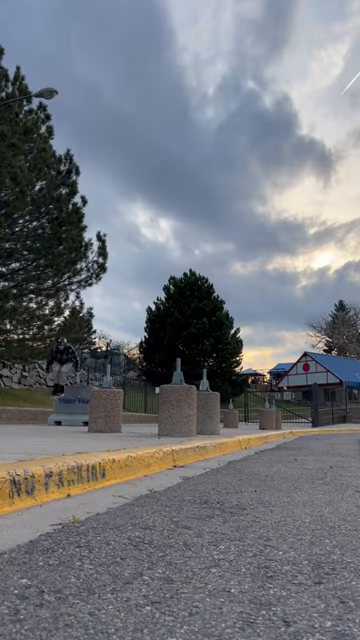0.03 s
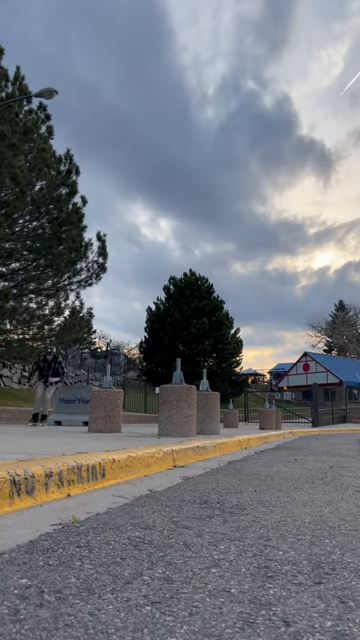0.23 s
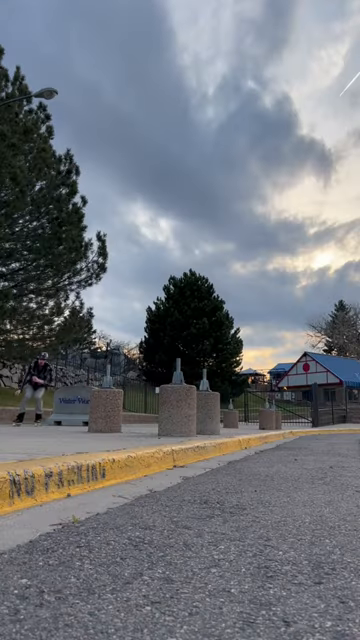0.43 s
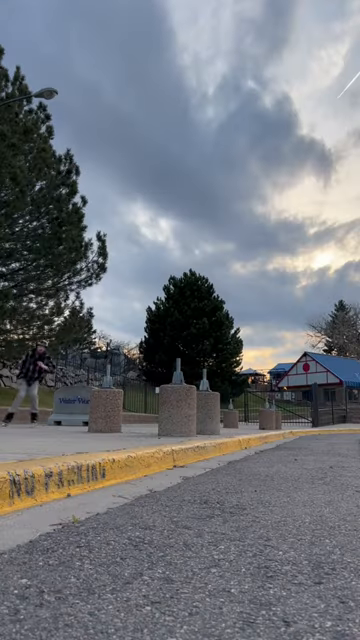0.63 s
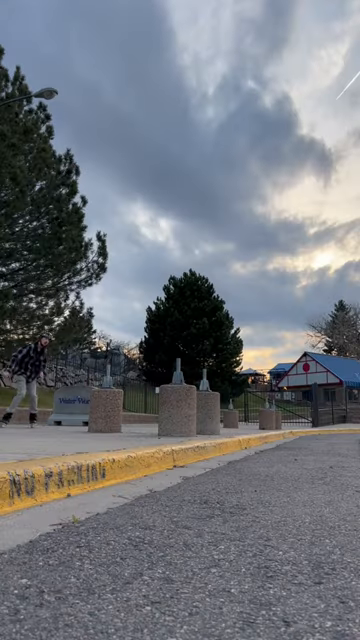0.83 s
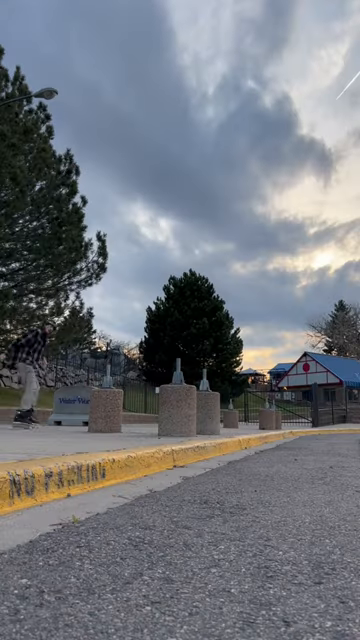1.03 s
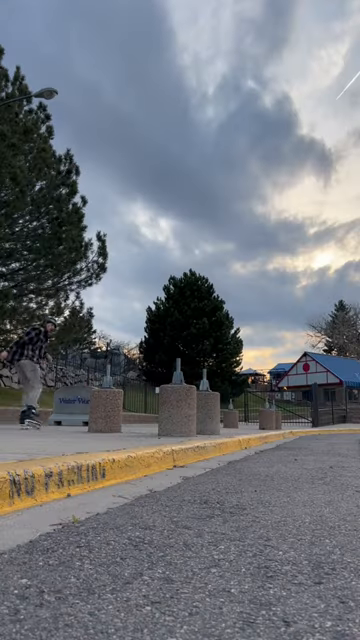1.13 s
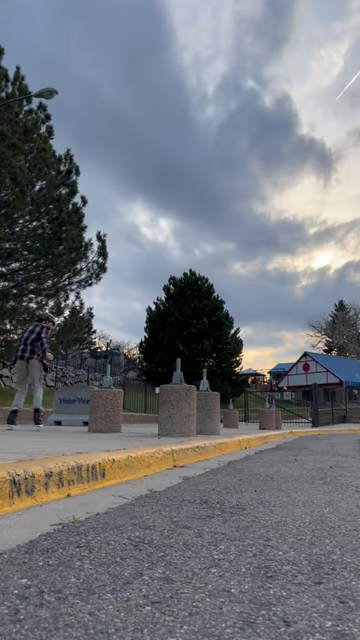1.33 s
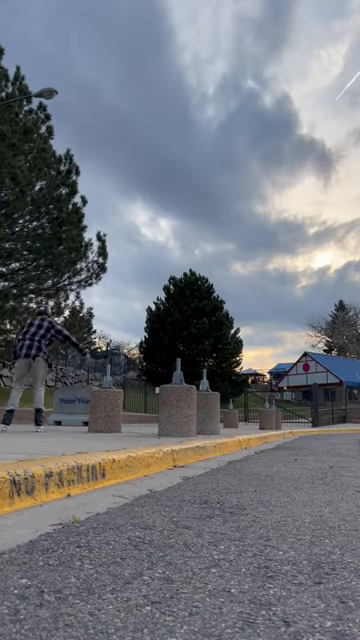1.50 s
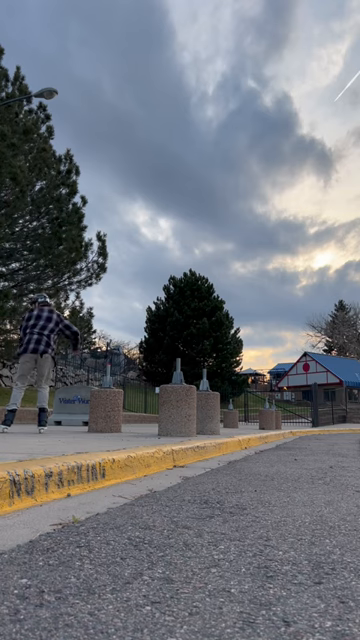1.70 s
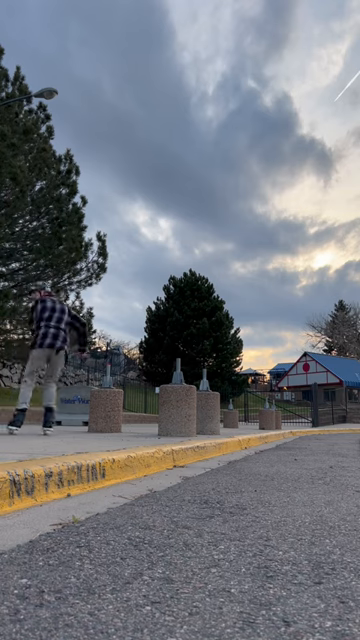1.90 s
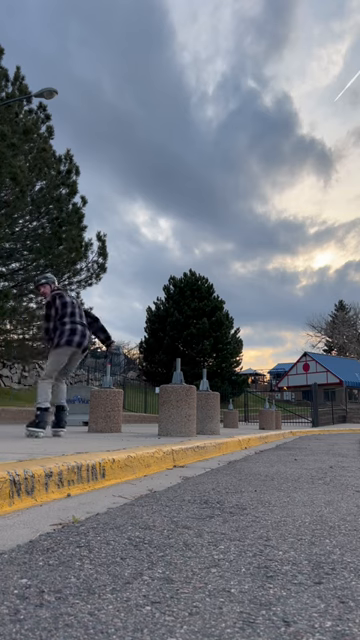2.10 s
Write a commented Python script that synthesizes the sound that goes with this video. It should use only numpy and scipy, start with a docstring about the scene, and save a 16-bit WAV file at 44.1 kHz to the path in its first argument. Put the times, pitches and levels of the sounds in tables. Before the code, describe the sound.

A skater lands a jump with a sharp, hollow clack, then wheels rumble and knock along outdoors

```python
"""An inline skater lands a jump on a concrete pavement and rolls on over grit and joints.
Both skates slam down milliseconds apart: each blow mixes a damped thump, a ringing boot and bursts of noise.
Random grains drive the growl, roar and hiss of rolling; pebbles clack, and later the wheels whir and squeak.
Walls and trees return a short, dull echo made of fading noise.
Low filtered noise is the rumble of wind and distant traffic."""
import sys
import numpy as np
from scipy import signal
from scipy.fft import rfft, irfft
from scipy.io import wavfile

SR = 44100
rng = np.random.default_rng(int(sys.argv[2]) if len(sys.argv) > 2 else 0)


def transcribe(u):
    """Save the signal u as a 16-bit wav file named by the first command-line argument.

    u: samples, shape (n,) or (channels, n), limited to [-1, 1]; the rate is SR.
    q: integer samples, one column per channel.
    """
    v = np.clip(np.atleast_2d(u).T, -1, 1)
    q = np.round(v * 32767).astype(np.int16)
    wavfile.write(sys.argv[1], SR, q)


N = 94815
T = np.arange(N) / SR  # time of each sample in seconds

# How loud the rolling is over time. Each row: time in seconds, then the levels of the low growl,
# the wheel roar and the gritty hiss, all in dB.
ROLLING_LEVELS = [(0, -41.5, -68, -89), (.11, -43.5, -70, -91), (0.161, -37, -58, -75),
                  (0.221, -42, -64, -82), (0.266, -30, -47.5, -53.5), (0.419, -46.5, -47.5, -69),
                  (.6, -42, -50.5, -69), (.8, -45, -47.5, -64), (1.0, -41.5, -48.5, -64.5),
                  (1.14, -40, -51, -66.5), (1.185, -37, -50, -56.5), (1.22, -40, -48, -68),
                  (1.371, -33, -49.5, -71.5), (1.44, -39.5, -54.5, -73), (1.5, -37, -51.5, -69),
                  (1.649, -39.5, -51, -87), (1.8, -42.5, -52, -69), (1.958, -42.5, -46.5, -66),
                  (2.15, -45, -43.5, -60.5)]
# Tone of wheels cracking on concrete. Each row: frequency in Hz, relative level in dB.
CRACK_TONE = [(100, -23), (600, 4.5), (1000, 1.5), (1400, 3.5), (1900, -1), (2400, -10), (3300, -16),
              (4300, -21), (8000, -45.5)]
# Tone of the bright tick of frames and crushed grit. Each row: frequency in Hz, relative level in dB.
TICK_TONE = [(1500, -27.5), (3200, 3.5), (4500, -4.5), (6500, 0), (7500, -4), (8400, -12), (10500, -10.5),
             (12300, -2.5), (13500, 0.5)]


def amp(db):
    """Turns decibels into a gain factor."""
    return 10 ** (np.asarray(db) / 20)


def unit(x):
    """Scales a sound to an average (rms) strength of 1."""
    return x / np.sqrt(np.mean(x ** 2) + 1e-20)


def read(points, hz):
    """Reads a table between its rows, with frequency on a log scale as in hearing."""
    f, value = np.transpose(points)
    return np.interp(np.log(hz + 1), np.log(f + 1), value)


def add(mix, s, sound):
    """Mixes a sound in, starting at s seconds."""
    part = mix[max(round(s * SR), 0):][:len(sound)]
    part += sound[:len(part)]


def colour(x, points):
    """Filters a sound by a table of levels per frequency, then scales it to rms 1."""
    hz = np.fft.rfftfreq(len(x), 1 / SR)
    return unit(irfft(rfft(x) * amp(read(points, hz)), len(x)))


def drift(hz):
    """Random wandering, mostly slower than the given rate, at rms 1."""
    slowness = 1 + (np.fft.rfftfreq(N, 1 / SR) / hz) ** 4
    return unit(irfft(rfft(rng.standard_normal(N)) / slowness, N))


def fading(t, t60):
    """Dies away steadily, losing 60 dB in t60 seconds."""
    return np.exp(-np.log(1000) * t / t60)


def rumble():
    """Wind and distant traffic: random noise, filtered to keep mostly the lows."""
    # Each row: frequency in Hz, relative level in dB.
    rumble_tone = [(20, -48), (32, -45), (50, 1.5), (75, 3.5), (130, 0.5), (220, -10.5), (400, -15.5),
                   (850, -19), (1500, -39), (3000, -73), (7000, -86), (14000, -73)]
    rumble_db = -43
    return amp(rumble_db) * colour(rng.standard_normal(N), rumble_tone)


def grains(spread_db=3, grains_per_s=5000):
    """Wheels hit tiny grains of stone: clicks at random moments, of random size and sign."""
    size = amp(spread_db * np.minimum(rng.exponential(1, N), 5))
    hit = rng.random(N) < grains_per_s / SR
    return size * rng.choice([-1., 1.], N) * hit


def rolling(bump_hz=35, growl_bump_db=0.0, roar_bump_db=1.25, grit_bump_db=1.23):
    """Grains drive a low growl, the wheels' roar and a gritty hiss; uneven ground shakes roar and hiss."""
    # Tones of the growl, roar and hiss. Each row: frequency in Hz, relative level in dB.
    growl_tone = [(40, -29.5), (70, -2), (100, -0.5), (135, -0.5), (190, -7.5), (250, -16), (400, -19.5),
                  (800, -33.5), (2000, -65)]
    roar_tone = [(100, 1.5), (250, 10), (430, -1), (620, -7.5), (880, 3.5), (1250, -2.5), (1850, -3.5),
                 (2350, -21), (3500, -27), (8000, -66)]
    grit_tone = [(800, -15), (2000, -0.5), (2750, 4.5), (3200, -2), (4200, 0), (4800, -8.5), (5300, -0.5),
                 (7200, -16), (8600, -25.5), (10500, -35.5), (12200, -6.5), (13500, -17)]
    s, *levels = np.transpose(ROLLING_LEVELS)
    tones = (growl_tone, roar_tone, grit_tone)
    depths_db = (growl_bump_db, roar_bump_db, grit_bump_db)
    bumps = drift(bump_hz)
    shared_grains = grains()
    out = np.zeros(N)
    for level, tone, depth_db in zip(levels, tones, depths_db):
        loudness = amp(np.interp(T, s, level) + depth_db * bumps)
        # each part hears the shared grains plus some of its own
        out += loudness * colour(shared_grains + grains(), tone)
    return out


def pebbles(spread_db=3, tick_db=-14):
    """Wheels clack over coarser stones: short noise bursts whose level follows the roar."""
    pebbles_per_s, kinds = 30, 12
    pebble_db = 2.5  # relative to the roar
    rise_s, t60_s = 0.0005, 0.011
    s, _, roar_db, _ = np.transpose(ROLLING_LEVELS)
    size = amp(np.interp(T, s, roar_db) + spread_db * np.minimum(rng.exponential(1, N), 2))
    hit = rng.random(N) < pebbles_per_s / SR
    kind = rng.integers(0, kinds, N)
    t = np.arange(1024) / SR
    envelope = fading(t, t60_s) * (1 - np.exp(-t / rise_s))
    out = np.zeros(N)
    for k in range(kinds):
        clack = colour(rng.standard_normal(len(t)), CRACK_TONE)
        clack += amp(tick_db) * colour(rng.standard_normal(len(t)), TICK_TONE)
        out += signal.oaconvolve(size * hit * (kind == k), clack * envelope)[:N]
    return amp(pebble_db) * out


def blow(thump_hz, thump_db, boot_db, crack_db, crack_hz, tick_db):
    """A wheel strikes: the skater's weight thumps, the boot rings, and contact cracks, ticks and rattles."""
    # Ringing tones of boot and frame. Each row: frequency in Hz, level in dB, time to fade by 60 dB in seconds.
    boot_modes = [(346, -7, .07), (531, -2, .048), (711, -13, .05), (1046, -9, .035), (1196, -9, .03),
                  (1420, -7, .02), (1500, -15, .028), (1772, -25, .035), (2192, -29, .04), (2341, -28, .04)]
    thump_rise_cycles, thump_cycles, boot_rise_s = 0.55, 1.364, 0.0011
    crack_rise_s, crack_t60_s, tick_rise_s, tick_t60_s = 0.0012, 0.03, 0.00088, 0.03
    crack_peak_db, crack_peak_octaves = 6, .3  # each crack stands out around its own pitch
    rattles_per_s, rattle_t60_s = 900, 0.26
    crack_rattle_db, tick_rattle_db = -21, -20.5  # relative to the crack and to the tick
    t = np.arange(8192) / SR

    cycles = thump_hz * t
    thump_rise = 1 - np.exp(-(cycles / thump_rise_cycles) ** 2)
    thump_fade = np.exp(-(cycles / (2 * thump_cycles)) ** 2)
    thump = thump_rise * thump_fade * np.sin(2 * np.pi * cycles) / 2

    boot = np.zeros(len(t))
    for hz, db, t60 in boot_modes:
        boot += amp(db) * fading(t, t60) * np.sin(2 * np.pi * hz * t)
    boot *= 1 - np.exp(-t / boot_rise_s)

    hz = np.geomspace(100, 16000, 100)
    peak = crack_peak_db * np.exp(-(np.log2(hz / crack_hz) / crack_peak_octaves) ** 2)
    peaked_tone = np.transpose([hz, read(CRACK_TONE, hz) + peak])

    contact, crush, chips = rng.standard_normal((3, len(t)))
    chips = chips * (rng.random(len(t)) < rattles_per_s / SR)  # loose grit: scattered clicks
    rattle_fade = fading(t, rattle_t60_s)

    crack = colour(contact, peaked_tone) * fading(t, crack_t60_s)
    crack += amp(crack_rattle_db) * colour(chips, CRACK_TONE) * rattle_fade
    crack *= 1 - np.exp(-t / crack_rise_s)

    tick = colour(crush, TICK_TONE) * fading(t, tick_t60_s)
    tick += amp(tick_rattle_db) * colour(chips, TICK_TONE) * rattle_fade
    tick *= (1 - np.exp(-t / tick_rise_s)) ** 2
    return amp(thump_db) * thump + amp(boot_db) * boot + amp(crack_db) * crack + amp(tick_db) * tick


def echo(x):
    """Walls and trees scatter the sound back as fading noise, each band dying at its own speed."""
    # Each row: frequency in Hz, time to fade by 60 dB in seconds.
    echo_times = [(100, 0.28), (400, 0.52), (1500, 0.37), (6000, 0.17), (12000, 0.61)]
    echo_db, swell_s = -22, 0.0073
    hz, t, bands = signal.stft(rng.standard_normal(SR // 2), SR, nperseg=256)
    bands = bands * fading(t, read(echo_times, hz)[:, None])
    tail = signal.istft(bands, SR, nperseg=256)[1]
    # the echo swells in rather than starting at once
    tail = tail * np.minimum(np.arange(len(tail)) / SR / swell_s, 1) ** 2
    return amp(echo_db) * signal.fftconvolve(x, tail / np.linalg.norm(tail))[:N]


def squeak():
    """A wheel squeaks faintly: one thin, unsteady tone that sinks in pitch."""
    # The row: start in seconds, length in seconds, first pitch in Hz, last pitch in Hz, level in dB.
    squeak_row = (1.68, .13, 3750, 3480, -73)
    start, length, first_hz, last_hz, db = squeak_row
    progress = np.clip((T - start) / length, 0, 1)
    wobble = 1 + .014 * drift(250)
    hz = (first_hz + (last_hz - first_hz) * progress) * wobble
    swell = np.sin(np.pi * progress)  # in and out again
    return amp(db) * 2 * swell * np.sin(2 * np.pi * np.cumsum(hz) / SR)


def whir():
    """Wheels whir as the skater turns: fuzzy tones climb in pitch, each wavering on its own."""
    # Path of the whir. Each row: time in seconds, pitch in Hz, level in dB.
    whir_path = [(1.72, 820, -57), (1.87, 850, -53), (1.98, 895, -48), (2.04, 980, -53), (2.15, 1030, -56)]
    # Tones sounding together. Each row: pitch ratio to the path, relative level in dB.
    whir_strands = [(.93, -7), (1, -1.5), (1.06, -6)]
    width_hz = 42  # how fuzzy each tone is
    waver, waver_hz = .015, 15  # typical share of the pitch, and rate
    s, path_hz, db = np.transpose(whir_path)
    out = np.zeros(N)
    for ratio, strand_db in whir_strands:
        hz = ratio * np.interp(T, s, path_hz) * (1 + waver * drift(waver_hz))
        phase = 2 * np.pi * np.cumsum(hz) / SR
        # random strengths of cosine and sine blur the tone into a narrow band
        fuzzy = drift(width_hz / 2) * np.cos(phase) + drift(width_hz / 2) * np.sin(phase)
        out += amp(strand_db) * fuzzy
    return out * amp(np.interp(T, s, db, left=-120))  # practically silent before the first row


def spread(x, apart):
    """The ground nearby scatters part of the sound, which reaches the two ports with opposite sign."""
    scatter_s = .03  # time for the scattering to fade to 37 percent
    scatter = rng.standard_normal(N) * np.exp(-T / scatter_s)
    scatter = scatter / np.linalg.norm(scatter)
    share = amp(read(apart, np.fft.rfftfreq(2 * N, 1 / SR)))
    side = irfft(rfft(x, 2 * N) * rfft(scatter, 2 * N) * share)[:N]
    return np.array([x + side, x - side])


def scene():
    """Adds up blows, rolling, echo and rumble, with one spread for the blows and another for the rest."""
    # Wheels of both skates landing, then wheels knocking on the ground and on joints.
    # Each row: start in seconds, thump pitch in Hz, thump level in dB, boot ring level in dB,
    # crack level in dB, crack pitch in Hz, tick level in dB.
    landing = [(0.2433, 700, -27, -31, -32, 1300, -39), (0.2468, 432, 0.5, -4, -15, 1230, -27),
               (0.2498, 243, -7, -24, -26, 1100, -22), (.2540, 243, -4.5, -19, -24, 596, -30),
               (.2620, 247, -12, -37, -24, 2400, -56)]
    knocks = [(0.029, 276, -36.5, -58, -37, 846, -51), (0.1197, 244, -30.5, -35, -31, 1010, -49.5),
              (0.127, 210, -49, -57, -36.5, 1800, -66), (0.2627, 94, -22.5, -44, -46, 1500, -62),
              (0.2746, 237, -18, -46, -45, 1500, -66), (.2840, 406, -21, -44, -33, 2600, -55),
              (.2925, 428, -18.5, -32, -30, 1730, -42), (0.303, 249, -19.5, -28, -34.5, 1110, -41),
              (0.549, 200, -30.5, -61, -42, 1640, -64), (0.646, 198, -41, -64, -41, 1820, -70),
              (0.734, 194, -37, -60, -41, 1790, -72), (.7800, 323, -38, -39, -39.5, 2500, -66),
              (0.819, 297, -31, -52, -43, 1900, -67), (1.0517, 142, -25.5, -58, -42, 1890, -58),
              (1.0837, 610, -22.5, -48, -38, 1960, -44), (1.0862, 393, -27.5, -35, -39, 620, -65),
              (1.1280, 403, -26.5, -39, -37.5, 1400, -52), (1.177, 139, -39, -58, -50, 3200, -56),
              (1.185, 133, -34, -53, -39, 4170, -50), (1.28, 305, -30, -46, -34, 1630, -47),
              (1.306, 132, -40, -53, -40, 1900, -54), (1.3392, 129, -48, -54, -45, 2000, -53),
              (1.35, 153, -25.5, -58, -33, 1210, -45.5), (1.379, 118, -21.5, -40, -44, 1790, -51),
              (1.402, 124, -21, -54, -50, 1500, -65), (1.458, 135, -49, -53, -43.5, 2020, -52.5),
              (1.491, 139, -40, -45, -42, 1600, -57), (1.7066, 135, -27, -45, -39, 990, -49),
              (1.7324, 340, -23.5, -53, -33.5, 2070, -44.5), (1.7353, 175.6, -13.5, -38.5, -38, 700, -65),
              (1.7410, 124, -13, -44, -38, 600, -61), (1.7564, 197, -26, -55, -40.5, 2690, -52),
              (1.8038, 139, -31, -63, -40.5, 1600, -73), (1.882, 139, -44, -58, -41, 2000, -51),
              (1.91, 144, -27, -61, -44, 2230, -47.5), (1.995, 140, -25, -52, -37, 1700, -70),
              (2.0825, 214, -27.5, -52, -32.5, 1250, -46.5), (2.1111, 201, -40, -52, -34.5, 1770, -50),
              (2.1288, 304, -31.5, -40, -36.5, 1000, -51)]
    # How much scattered sound differs between the ports. Each row: frequency in Hz, share in dB.
    apart_blows = [(60, -32), (200, -30), (450, -20), (700, -11), (1400, -22), (2000, -18), (2800, -7),
                   (4000, -7), (5000, -2), (6000, -13), (8000, -13), (12000, -18)]
    apart_roll = [(25, -14), (60, -24), (125, -31), (260, -25), (400, -14), (500, -10), (690, -4),
                  (1000, -7), (1400, -17), (2000, -20), (2800, -8), (4000, -8), (5000, -2), (6000, -13),
                  (8000, -14), (10000, -7), (12000, -15)]
    blows = np.zeros(N)
    for s, *row in landing + knocks:
        add(blows, s, blow(*row))
    wheels = rolling() + pebbles() + squeak() + whir()
    around = echo(blows + wheels) + rumble()
    return spread(blows, apart_blows) + spread(wheels + around, apart_roll)


def record(dry):
    """Two close microphone ports differ in phase and level; then the highest treble is cut."""
    # Each row: frequency in Hz, lead of the left port in radians.
    port_phase = [(0, 0), (7500, 0), (10000, -1.4), (11500, -2.6), (12500, -2.95)]
    # Each row: frequency in Hz, left minus right level in dB.
    port_balance = [(60, 0), (300, .1), (520, 1.8), (750, 1.8), (1400, .1), (2500, -.2), (4000, .8),
                    (5000, 2.4), (6000, 1), (12000, 0)]
    edge_hz = 12900
    hz = np.fft.rfftfreq(2 * N, 1 / SR)
    # half of each difference goes to the left, the opposite half to the right
    port = amp(read(port_balance, hz) / 2) * np.exp(.5j * read(port_phase, hz))
    ends = np.clip(np.minimum(T, T[-1] - T) / .003, 0, 1)  # 3 ms fades at both ends
    heard = irfft(rfft(dry * ends, 2 * N) * np.array([port, 1 / port]))[:, :N]
    low_pass = signal.firwin(255, edge_hz, window=("kaiser", 8), fs=SR)
    return signal.oaconvolve(heard, low_pass[None], "same")


dry = scene()
out = record(dry)
transcribe(out)
```